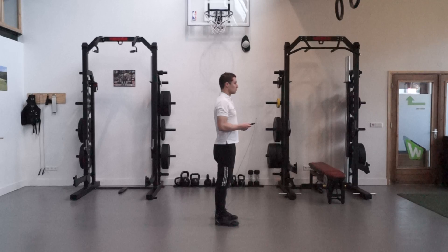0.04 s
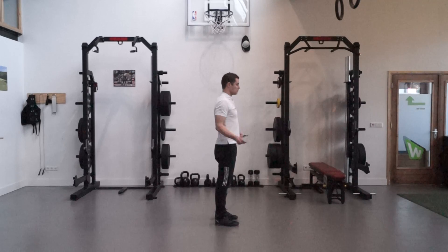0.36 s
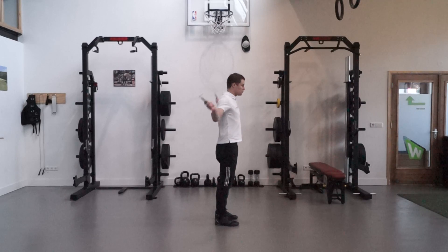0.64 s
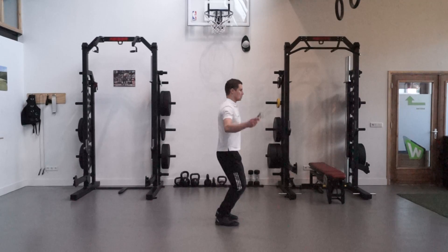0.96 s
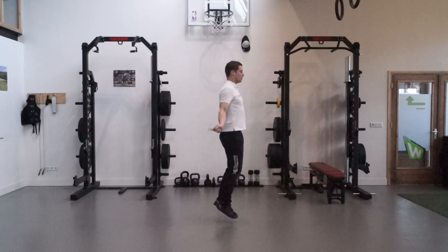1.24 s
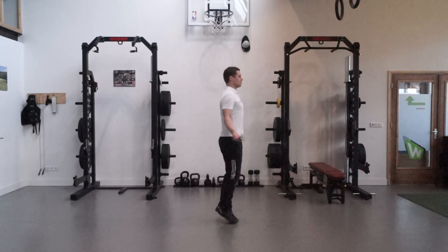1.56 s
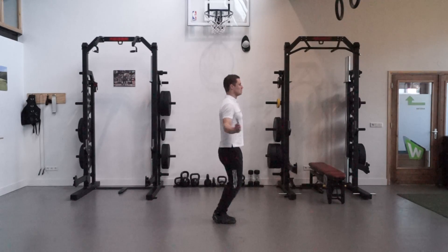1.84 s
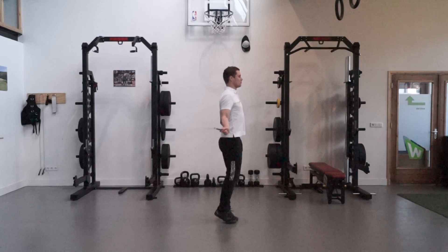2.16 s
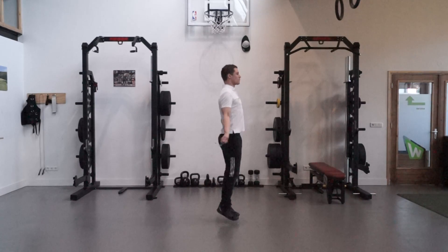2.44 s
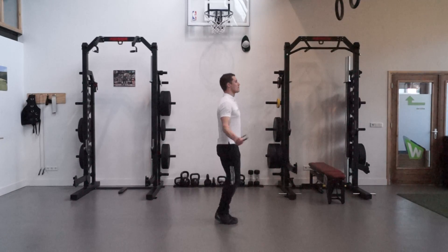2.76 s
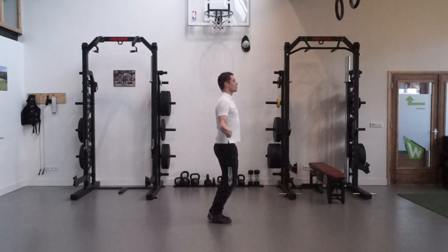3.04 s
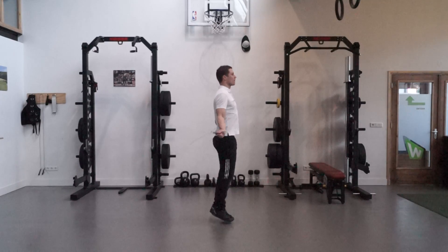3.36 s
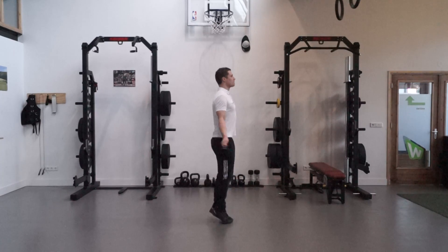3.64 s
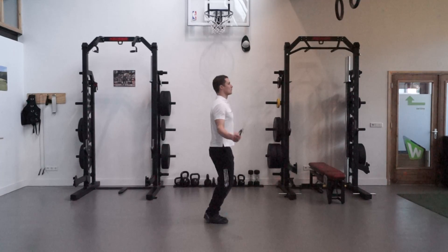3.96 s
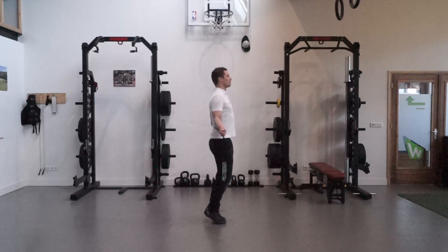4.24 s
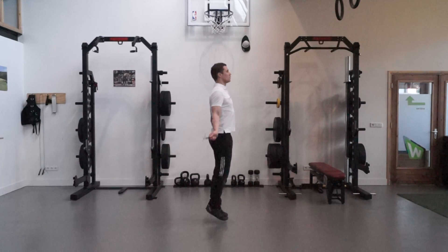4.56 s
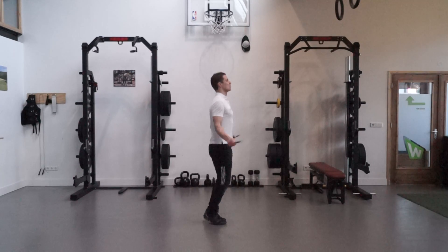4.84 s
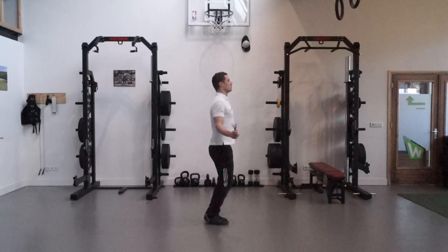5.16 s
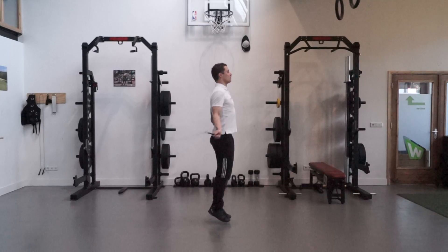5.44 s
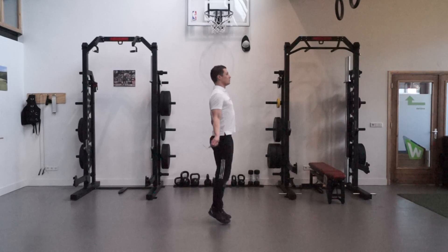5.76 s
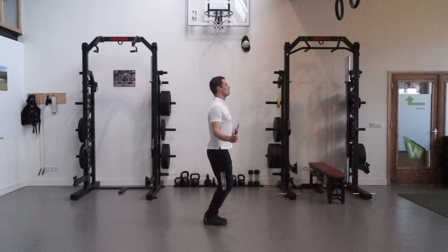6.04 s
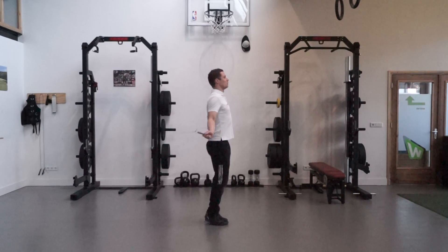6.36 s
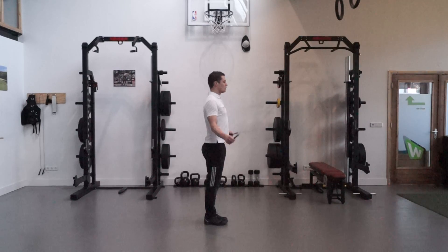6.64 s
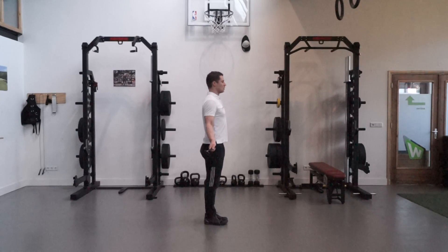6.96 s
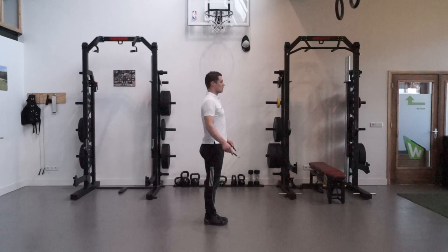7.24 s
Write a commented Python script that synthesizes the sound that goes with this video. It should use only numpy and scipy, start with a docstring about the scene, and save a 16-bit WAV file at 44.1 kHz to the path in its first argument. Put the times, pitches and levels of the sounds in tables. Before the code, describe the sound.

A faint fan hum and airy hiss fill a bare, echoing gym throughout. At about 0.6 seconds a shoe steps down softly, and a thin cable jump rope begins a quiet whirr. It first slaps the hard floor at 1.2 seconds, then settles into a steady rhythm, a little over two turns a second. Each turn has a whistling whirr that rises on the downswing and sags afterwards, a bright snap on the floor, and the thud and scuff of shoes landing just behind it. The cable ticks faintly around 3 seconds and drags with a brief hiss near 3.4, 3.8 and 5.4 seconds. The thirteenth turn comes at 6.3 seconds, followed by two footfalls. A slower last swing slaps down at 6.8 seconds and hits a shoe with a loud clack. Two light ticks follow at 7 and 7.3 seconds as faint high tones linger in the echo.

```python
"""A fan hums in a bare, echoing gym. A shoe steps down, and a thin cable rope is lifted into its swing.
On every turn it sheds vortices and whirrs, fastest on the downswing, then slaps the floor; the shoes
land about 150 ms later. Now and then the cable ticks, or drags on after a slap. After thirteen turns
it comes down once more, is stopped by a shoe with a loud clack, and drops with two light ticks.
Faint high tones linger in the hall's echo while the fan hums on."""
import sys
import numpy as np
from scipy import signal
from scipy.fft import rfft, irfft, next_fast_len
from scipy.io import wavfile
from scipy.ndimage import map_coordinates

SR = 44100
rng = np.random.default_rng(int(sys.argv[2]) if len(sys.argv) > 2 else 0)


def materialize(psi):
    """Save the field psi as 16-bit PCM at rate SR to the path in sys.argv[1].

    A 1-D psi becomes a single channel; in a 2-D psi each row is a channel.
    """
    bounded = np.clip(np.atleast_2d(psi).T, -1, 1)
    quanta = np.round(bounded * 32767).astype(np.int16)
    wavfile.write(sys.argv[1], SR, quanta)


N = 322371
TIME = np.arange(N) / SR


def amp(db):
    """Decibels to amplitude ratio."""
    return 10 ** (np.asarray(db) / 20)


def unit(x):
    """Normalisation to rms 1."""
    return x / np.sqrt(np.mean(x ** 2) + 1e-20)


def along(points, hz):
    """Interpolation of (frequency_hz, value) points on a logarithmic frequency axis."""
    knots_hz, values = np.transpose(points)
    return np.interp(np.log(hz + 1), np.log(knots_hz + 1), values)


def curves(rows):
    """Linear interpolation in time: one value per sample for each column after the first."""
    times_s, *columns = np.transpose(rows)
    return [np.interp(TIME, times_s, column) for column in columns]


def wobble(rate_hz):
    """Smooth random modulation: a spline through rate_hz Gaussian knots a second."""
    return map_coordinates(rng.standard_normal(N // 16), [TIME * rate_hz], mode="wrap")


def filtered(x, gain):
    """Zero-phase filtering: the spectrum is multiplied by gain(hz)."""
    n = x.shape[-1]
    padded = next_fast_len(n + 4096, True)
    return irfft(rfft(x, padded) * gain(np.fft.rfftfreq(padded, 1 / SR)), padded)[..., :n]


def coloured(noise, spectrum):
    """Spectral shaping of noise, at rms 1."""
    return unit(filtered(noise, lambda hz: amp(along(spectrum, hz))))


def minimum_phase(spectrum, size=1024):
    """Folding the cepstrum gives the most compact causal impulse response with this spectrum."""
    cepstrum = irfft(np.log(amp(along(spectrum, np.fft.rfftfreq(size, 1 / SR)))))
    cepstrum[1:size // 2] *= 2
    cepstrum[size // 2 + 1:] = 0
    return irfft(np.exp(rfft(cepstrum)))


def add(out, start_s, sound):
    """Superposition: a sound joins the stereo mix at start_s."""
    start = round(start_s * SR)
    out[:, start:start + sound.shape[1]] += sound[:, :N - start]


# Width of the diffuse field: frequency_hz, side_re_mid_db
DIFFUSE_WIDTH = [(100, -14.5), (250, -10.5), (500, -8), (1000, -5), (2000, -2.5), (4000, -2.5),
                 (8000, -0.5), (14000, 1)]
def diffuse(n):
    """Diffuse-field coherence: noise from all sides is alike in the bass, unrelated in the treble."""
    mid, side = rng.standard_normal((2, n))
    ratio = lambda hz: amp(along(DIFFUSE_WIDTH, hz))
    mid = filtered(mid, lambda hz: 1 / np.hypot(1, ratio(hz)))
    side = filtered(side, lambda hz: ratio(hz) / np.hypot(1, ratio(hz)))
    return np.array([mid + side, mid - side])


# The dull direct path: frequency_hz, gain_db
DIRECT_SPECTRUM = [(200, 1), (2500, -0.5), (4500, -6.5), (8000, -6.5), (15000, -10)]
# First echoes from ceiling and walls: delay_s, gain_db, left_right_lag_s
REFLECTIONS = [(0.0154, 0, .00003), (.0195, -6, -.00005), (.026, -7.5, .0001), (.033, -10.5, -.0001),
               (.049, -8.5, .0001), (.07, -4, -.00005)]
def early(direct_db):
    """Specular reflection: delayed copies follow the direct sound to each ear."""
    path = np.zeros((2, SR))
    direct = amp(direct_db) * minimum_phase(DIRECT_SPECTRUM)
    path[:, :len(direct)] += direct
    for delay_s, gain_db, lag_s in REFLECTIONS:
        delay_s += rng.normal(0, .0007)  # the source is never twice in the same place
        for ear, arrival_s in enumerate([delay_s - lag_s / 2, delay_s + lag_s / 2]):
            path[ear, abs(round(arrival_s * SR))] += amp(gain_db)
    return path


# Reverberation time of the gym: frequency_hz, t60_s
HALL_DECAY = [(120, 2.1), (400, 1.28), (1000, 1.66), (2500, 1.21), (4500, 1.6), (8000, 0.94), (15000, 0.63)]
def tail(tail_db, build_s=0.016):
    """Reverberation: the diffuse field builds quickly and decays exponentially, high treble first."""
    hz, t, bands = signal.stft(diffuse(SR), SR, nperseg=256)
    decay = amp(-60 * t / along(HALL_DECAY, hz)[:, None])
    dying = signal.istft(bands * decay, SR, nperseg=256)[1][:, :SR]
    age_s = np.maximum(np.arange(SR) / SR - .005, 0)
    return dying * (1 - np.exp(-age_s / build_s)) * amp(tail_db) / np.sqrt(SR / 10)


def contact(spectrum, rise_s, t60_s, direct_db, tail_db):
    """Source and filter: a brief noisy force is coloured by the struck body and returned by the hall."""
    t = np.arange(SR // 8) / SR
    swell = (1 - np.exp(-t / rise_s)) ** 2
    force = rng.standard_normal(len(t)) * swell * amp(-60 * t / t60_s)
    force /= np.linalg.norm(force)
    near = signal.fftconvolve(force[None], early(direct_db), axes=1)[:, :SR]
    body = minimum_phase(spectrum)
    body *= np.sqrt(SR / 100) / np.linalg.norm(body)  # the energy of 10 ms at rms 1
    # the tail sums all directions, so it keeps only the mean colour
    return signal.fftconvolve(near + tail(tail_db), body[None], axes=1)[:, :SR]


# The fan runs down a little: time_s, pitch_hz, level_db
FAN_HUM = [(0, 222.4, -60.5), (.3, 224.2, -63), (1, 218.7, -68), (1.6, 218.8, -69), (4, 215.7, -74),
           (7.3, 211.8, -68.5)]
# Its partials: pitch_ratio, gain_db
FAN_PARTIALS = [(3 / 4, -16), (1, 0), (7 / 6, -10), (4 / 3, -17), (3 / 2, -11)]
# Hiss of the air and low drone of the duct: frequency_hz, gain_db
AIR_SPECTRUM = [(25, -37), (70, -50), (120, -17), (170, -13), (330, -11), (600, -12.5), (850, -15),
                (1400, -16), (2500, -18), (6000, -21), (15500, -26)]
DUCT_SPECTRUM = [(20, -70), (85, -32), (100, 8.5), (108, -2), (125, -6), (300, -56)]
def ventilation():
    """Tonal and broadband fan noise: a wavering hum over an even hiss and a duct drone."""
    pitch_hz, level_db = curves(FAN_HUM)
    phase = 2 * np.pi * np.cumsum(pitch_hz) / SR
    hum = sum(amp(gain_db + 1.1 * wobble(7.9)) * np.sin(ratio * phase + 0.092 * wobble(4.5))
              for ratio, gain_db in FAN_PARTIALS)
    air = coloured(diffuse(N), AIR_SPECTRUM)
    drone = coloured(diffuse(N), DUCT_SPECTRUM)
    return np.sqrt(2) * amp(level_db) * hum + amp(-58) * air + amp(-78) * drone


# Shoes meeting the floor: start_s, relative_level_db, scuff_re_level_db
FOOTFALLS = [(0.56, -45, -9), (1.409, -31.5, -10.5), (1.818, -30, -16.5), (2.233, -29.5, -16.5),
             (2.653, -29, -21.5), (3.062, -27.5, -25), (3.471, -28.5, -16.5), (3.485, -30, -27),
             (3.892, -26, -17.5), (4.308, -28.5, -13.5), (4.736, -29.5, -17.5), (5.16, -28, -15),
             (5.575, -28, -22), (5.994, -28, -17), (6.006, -31, -22), (6.396, -27.5, -18.5),
             (6.494, -32.5, -23)]
# Thud and scuff of a sole: frequency_hz, gain_db
SOLE_SPECTRUM = [(50, -43), (110, -25.5), (190, -16.5), (270, -6.5), (420, -2.5), (570, 1.5), (750, -1.5),
                 (1000, -5.5), (1400, -2.5), (1900, -8), (3000, -38.5), (8000, -42.5)]
SCUFF_SPECTRUM = [(500, -38), (1400, -11), (2300, 9.5), (3500, 1), (6000, -14), (10000, -20), (16000, -32)]
def landings():
    """Impact and friction: the soles thud on the hard floor and scuff as they flatten."""
    out = np.zeros((2, N))
    for start_s, level_db, scuff_db in FOOTFALLS:
        # a hard heel is bright and brief; the ball of the foot is dull and slow
        rise_s = 0.00017 * amp(-1.1 * scuff_db)
        thud = contact(SOLE_SPECTRUM, rise_s, t60_s=0.009 + 13 * rise_s, direct_db=2, tail_db=11)
        scuff = contact(SCUFF_SPECTRUM, rise_s, t60_s=0.017, direct_db=2, tail_db=16.5)
        add(out, start_s - .001, amp(level_db - 11) * thud)
        add(out, start_s, amp(level_db + scuff_db - 10.5) * scuff)
    return out


# The first slow lift of the rope: time_s, pitch_hz, relative_level_db
FIRST_LIFT = [(0.72, 794, -95), (0.82, 1203, -65), (0.94, 1202, -64), (1.02, 806, -67), (1.11, 996, -62),
              (1.25, 797, -95)]
# Each turn, in relative levels: slap_s, top_pitch_hz, downswing_db, overhead_db, snap_db, pat_db
ROPE_TURNS = [(1.2184, 1661, -46.5, -42.5, -33, -45.5), (1.682, 1881, -40.5, -46, -32.5, -45),
              (2.1029, 1941, -40, -55, -34, -46), (2.5055, 1961, -40, -44.5, -32.5, -44),
              (2.9257, 2030, -40.5, -43, -29, -41), (3.3289, 1942, -40, -45, -30.5, -43),
              (3.7397, 2060, -39, -46.5, -28.5, -40.5), (4.155, 1947, -40.5, -39, -32, -44),
              (4.5668, 1941, -39, -37.5, -28.5, -41), (4.9896, 1931, -38.5, -38, -32.5, -48),
              (5.3914, 1930, -39.5, -40.5, -30.5, -45.5), (5.8128, 1900, -41.5, -41, -30, -44.5),
              (6.2634, 1702, -46, -53, -30.5, -43.5), (6.8195, 893.5, -55, -56, -30.5, -43.5)]
def swing():
    """Pitch follows speed: the wrists whip the rope down, then it coasts and slows as it climbs."""
    lead_s, hold_s = .035, .075  # top speed comes this long before the slap and lasts this long
    surge_per_s, base_sag_per_s = 4.5, .95  # share of the top speed gained and lost
    swell_db_per_s, fade_db_per_s = 168, 26
    overhead_s, overhead_width_s = 0.21, 0.071  # second swell, as the loop rises over the head
    pitch_hz, lift_db = curves(FIRST_LIFT)
    power = amp(lift_db) ** 2
    for slap_s, top_hz, downswing_db, overhead_db, *_ in ROPE_TURNS:
        t = TIME - slap_s + lead_s
        before, after = np.maximum(-t, 0), np.maximum(t, 0)
        # a turn that is louder overhead has kept more of its speed
        sag = base_sag_per_s * np.exp(0.09 * (downswing_db - overhead_db)) * np.maximum(t - hold_s, 0)
        pitch_hz = np.maximum(pitch_hz, top_hz * (1 - surge_per_s * before - sag))
        downswing = amp(downswing_db - swell_db_per_s * before - fade_db_per_s * after) ** 2
        overhead = amp(overhead_db) ** 2 * np.exp(-((t - overhead_s) / overhead_width_s) ** 2)
        power += downswing + overhead
    return pitch_hz, np.sqrt(power)


def moving(source, tail_db, steps=18):
    """Time-varying propagation: a moving source crossfades from one set of echoes to the next."""
    out, hop = np.zeros((2, N)), N // steps + 1
    for centre in range(0, N + hop, hop):
        span = np.arange(max(centre - hop, 0), min(centre + hop, N))
        piece = source[span] * np.cos(np.pi / 2 * (span - centre) / hop)
        hall = early(direct_db=-0.5) + tail(tail_db)
        add(out, span[0] / SR, signal.fftconvolve(piece[None], hall, axes=1))
    return out


# Whistle strength along the loop: share_of_top_speed, gain_db
LOOP_WHISTLE = [(.2, -17.5), (.34, -14.5), (.5, -21.5), (.6, -11.5), (.72, -7), (.88, 0.5), (1, -1)]
def whirr(parts=22):
    """Aeolian tones: each part of the loop sheds vortices at a pitch proportional to its airspeed."""
    pitch_hz, envelope = swing()
    fastest_phase = 2 * np.pi * np.cumsum(pitch_hz) / SR
    tones = np.zeros(N)
    for share in np.linspace(LOOP_WHISTLE[0][0], 1, parts):
        phase = share * fastest_phase
        strength = amp(np.interp(share, *np.transpose(LOOP_WHISTLE)))
        tones += strength * (wobble(160) * np.cos(phase) + wobble(160) * np.sin(phase))
    # soft hiss of the turbulent wake: frequency_hz, gain_db
    wake = [(60, -41), (300, -21), (1100, -0.5), (1900, 6.5), (2500, -2.0), (6000, -11),
            (10000, -17.5), (16000, -22)]
    hiss = coloured(rng.standard_normal(N), wake)
    source = amp(-7.5) * envelope * (unit(tones) + amp(-8) * hiss)
    return moving(source, tail_db=7)


# Ticks of the loose cable: start_s, relative_level_db
CABLE_TICKS = [(.782, -64), (2.955, -58), (3.262, -60), (7.003, -45), (7.269, -59)]
# The cable's bright snap, in ticks and slaps alike: frequency_hz, gain_db
SNAP_SPECTRUM = [(500, -21), (1800, 1), (3000, 0.5), (5000, -1.5), (8000, -1), (12000, -1.5), (15500, -1)]
def ticks():
    """Light impacts: brief contacts of the slack cable radiate faint, bright clicks."""
    out = np.zeros((2, N))
    for start_s, level_db in CABLE_TICKS:
        tick = contact(SNAP_SPECTRUM, rise_s=.0005, t60_s=.025, direct_db=13, tail_db=10)
        add(out, start_s, amp(level_db - 1.5) * tick)
    return out


# The cable's dull pat on the floor: frequency_hz, gain_db
PAT_SPECTRUM = [(100, -58.5), (260, -11.5), (450, -1), (680, -0.5), (1000, -1.5), (1450, -7.5), (2200, -14),
                (5000, -51)]
def slaps(swish_s=0.2):
    """Flow noise, then impact: the cable swishes down, pats the floor and skids with a bright snap."""
    out, dive = np.zeros((2, N)), np.zeros(N)
    for slap_s, *_, snap_db, pat_db in ROPE_TURNS:
        snap = contact(SNAP_SPECTRUM, rise_s=0.00038, t60_s=0.065, direct_db=-2, tail_db=9.5)
        pat = contact(PAT_SPECTRUM, rise_s=0.00096, t60_s=0.036, direct_db=4.5, tail_db=12.5)
        add(out, slap_s, amp(snap_db - 10.5) * snap + amp(pat_db - 3) * pat)
        dive += amp(snap_db - 25.5) * np.interp(TIME, [slap_s - swish_s, slap_s, slap_s + .02], [0, 1, 0])
    swish = coloured(diffuse(N), SNAP_SPECTRUM)
    return out + dive * swish


# The cable drags on after some slaps: start_s, relative_level_db
CABLE_DRAGS = [(3.37, -51), (3.82, -49.5), (5.41, -52.5)]
def drags():
    """Sliding friction: the dragging cable gives a short, narrower hiss."""
    out = np.zeros((2, N))
    # frequency_hz, gain_db
    rub = [(2000, -27), (4000, -5), (6000, 2), (7500, -6), (10000, -12), (16000, -22)]
    for start_s, level_db in CABLE_DRAGS:
        add(out, start_s, amp(level_db) * contact(rub, rise_s=.015, t60_s=.2, direct_db=7, tail_db=10))
    return out


# The cable against a planted shoe: frequency_hz, gain_db
CLACK_SPECTRUM = [(80, -57), (250, -22.5), (400, -11.5), (620, 2), (820, -4), (1150, 3.5), (1600, -1.5),
                  (2050, 0), (2800, -2), (3600, -7), (4800, -15.5), (8000, -18), (15000, -25)]
# Faint high tones in the hall's echo after the clack: pitch_hz, level_db, t60_s
ECHO_TONES = [(2730, -49, 0.93), (3280, -45, 1.22), (3460, -44, 1.1)]
def catch(start_s=6.918, relative_level_db=-20.5):
    """Impact and reverberation: the cable clacks against a shoe; faint high tones linger in the echo."""
    out = np.zeros((2, N))
    clack = contact(CLACK_SPECTRUM, rise_s=0.0019, t60_s=0.014, direct_db=5.5, tail_db=15.5)
    t = np.arange(SR) / SR
    tones = sum(amp(level_db - 60 * t / t60_s) * np.sin(2 * np.pi * pitch_hz * t)
                for pitch_hz, level_db, t60_s in ECHO_TONES)
    add(out, start_s, amp(relative_level_db - 10.5) * clack + tones)
    return out


def scene():
    """Superposition: the pressures of fan, feet and rope add in the gym."""
    return ventilation() + landings() + whirr() + ticks() + slaps() + drags() + catch()


# Stereo balance: frequency_hz, left_re_right_db
BALANCE = [(300, 0.5), (1000, -0.7), (6000, -0.8), (10000, -1), (14000, -3)]
def record(dry, top_hz=15850):
    """Level difference and band limit: the sound fades in, leans right in the treble, ends at top_hz."""
    fade = np.clip((TIME - .04) / .02, 0, 1)
    lean = lambda hz: amp(np.outer([.5, -.5], along(BALANCE, hz)))
    return filtered(dry * fade, lambda hz: lean(hz) * (hz < top_hz))


dry = scene()
out = record(dry)
materialize(out)
```